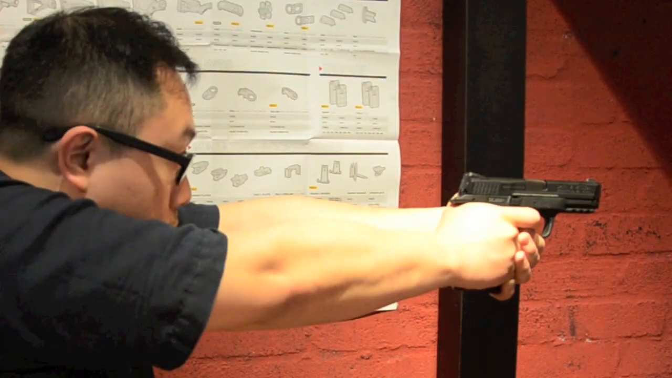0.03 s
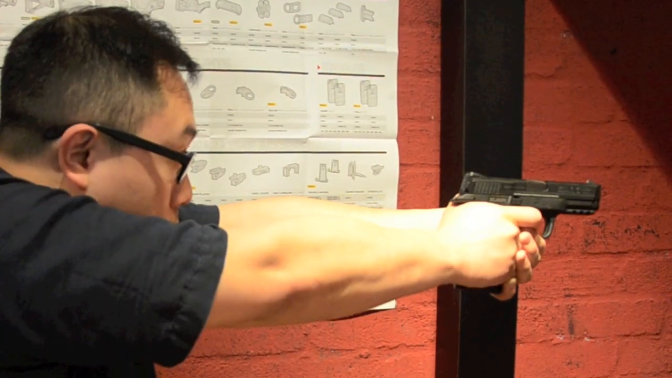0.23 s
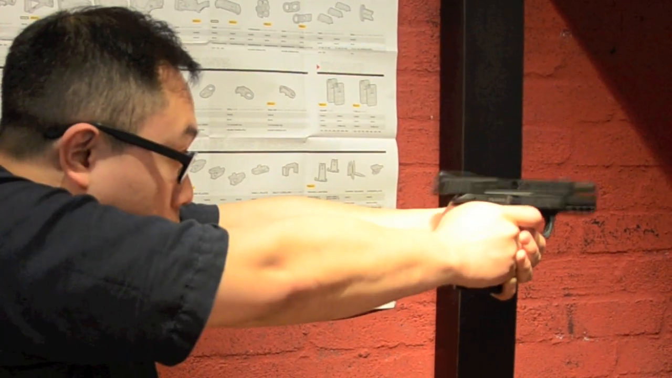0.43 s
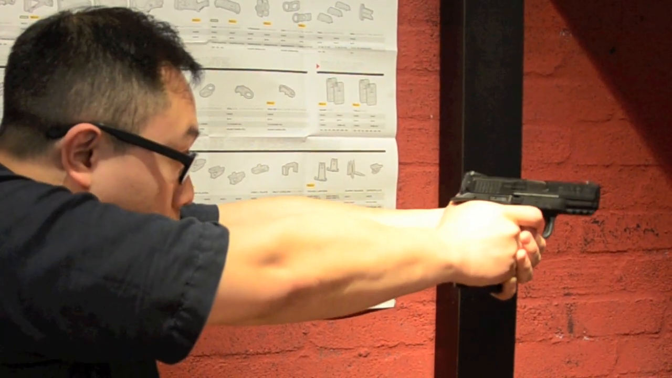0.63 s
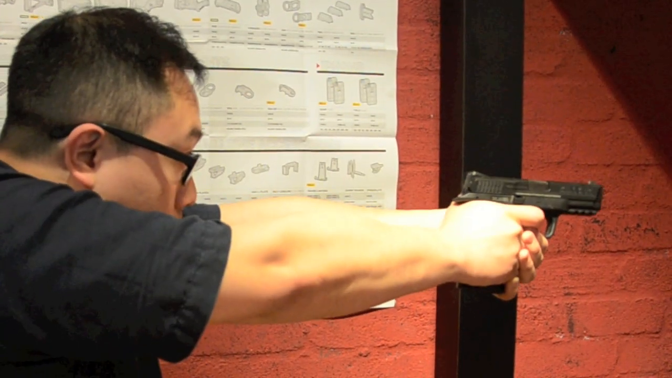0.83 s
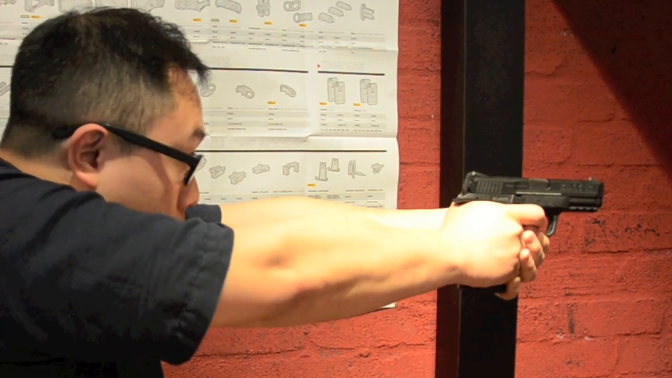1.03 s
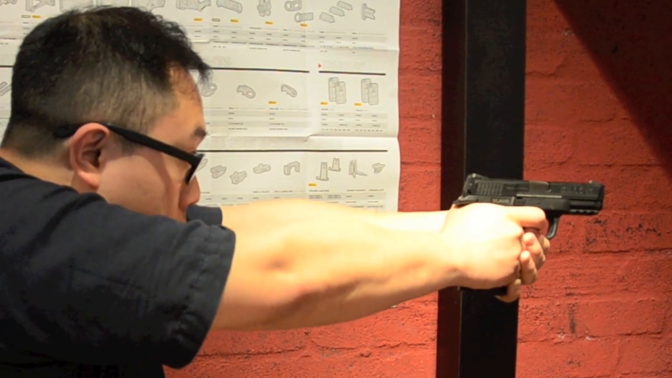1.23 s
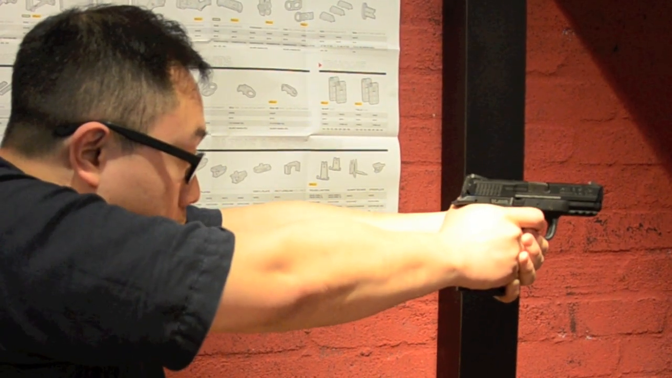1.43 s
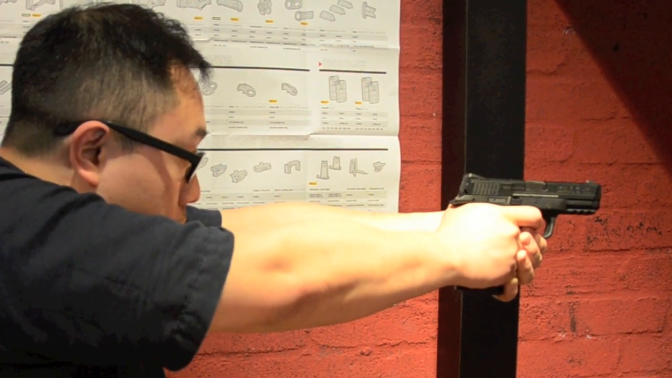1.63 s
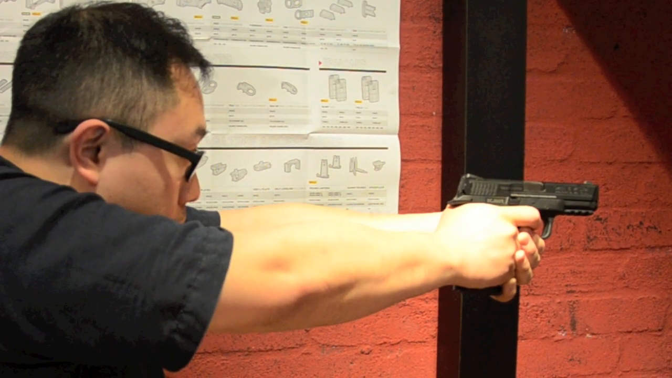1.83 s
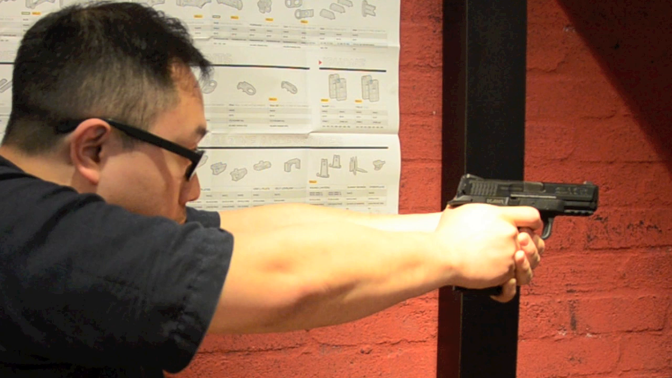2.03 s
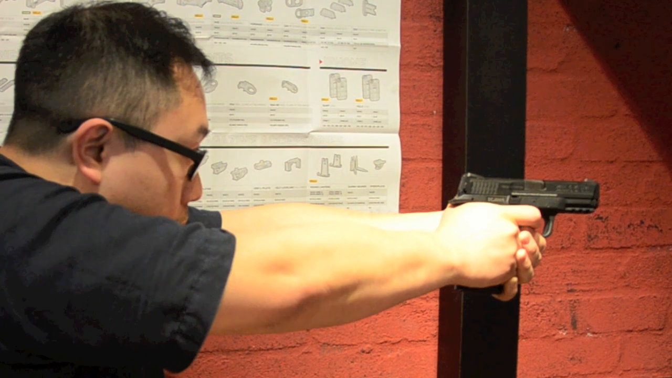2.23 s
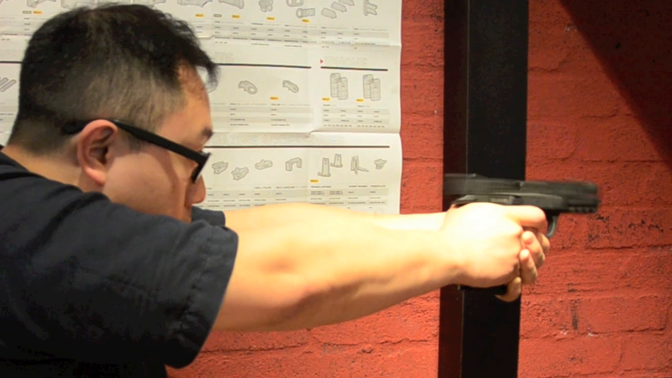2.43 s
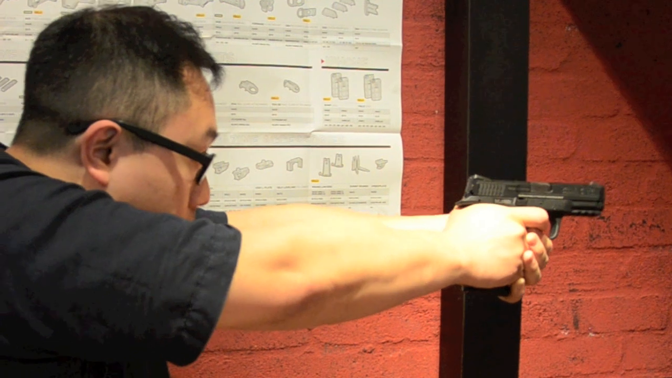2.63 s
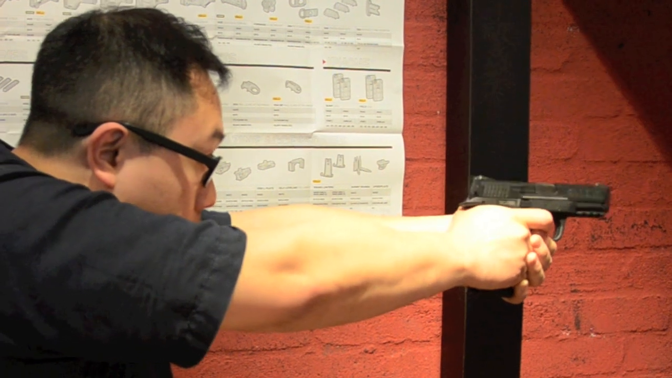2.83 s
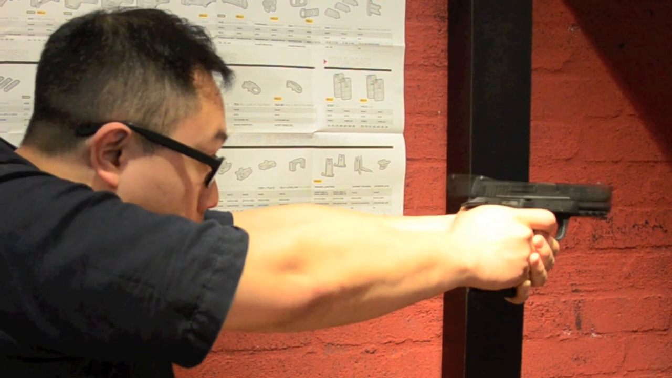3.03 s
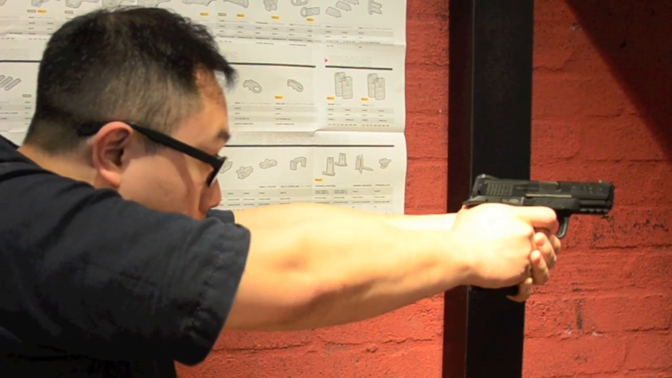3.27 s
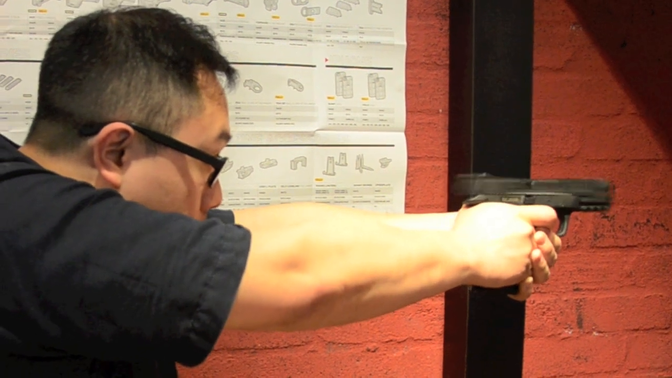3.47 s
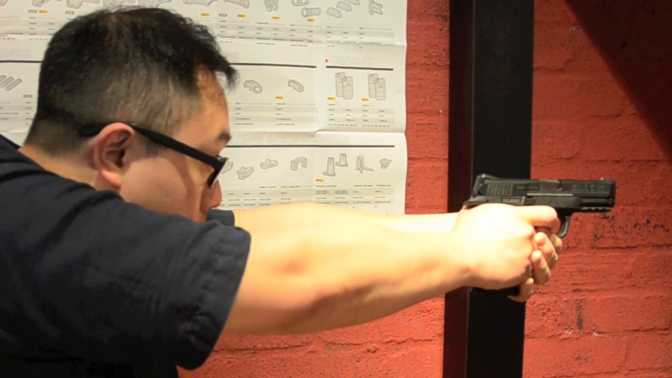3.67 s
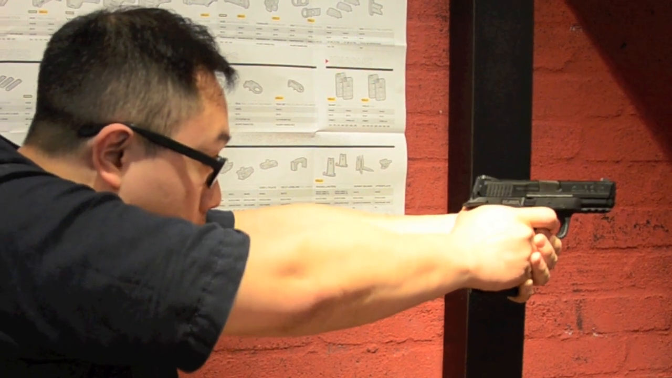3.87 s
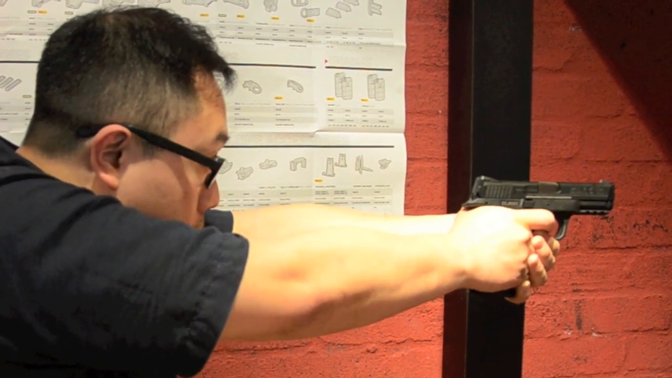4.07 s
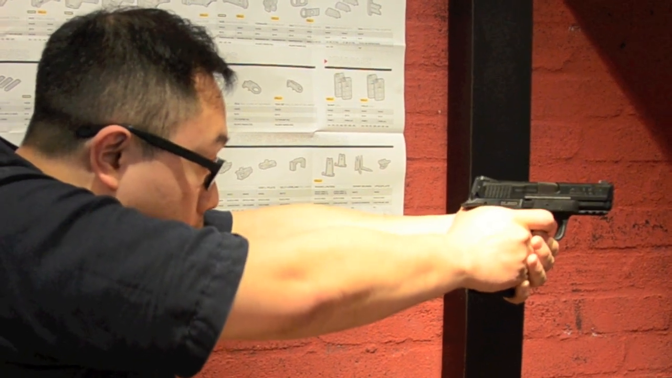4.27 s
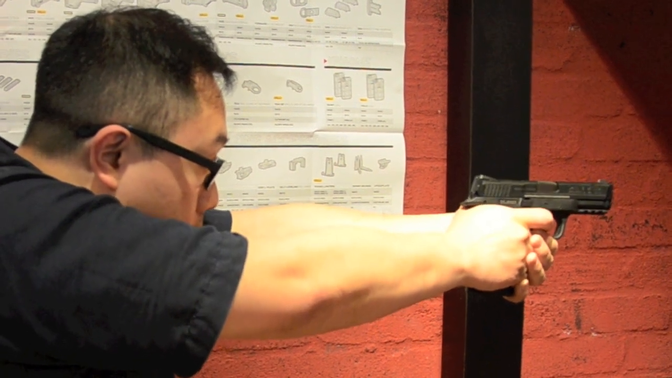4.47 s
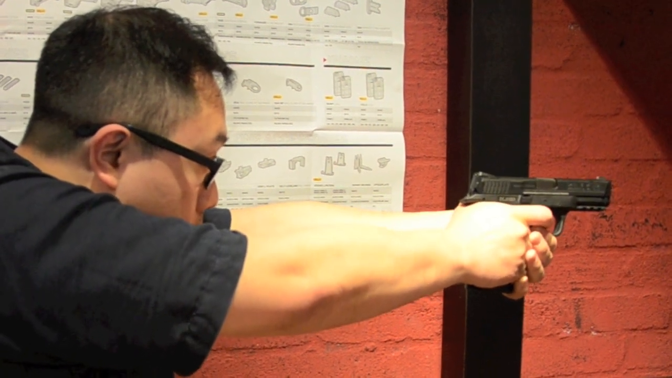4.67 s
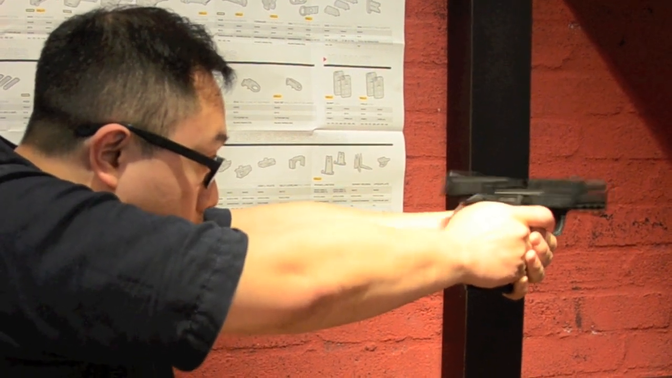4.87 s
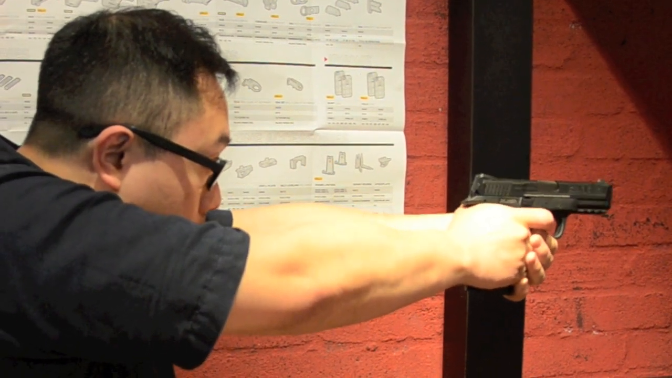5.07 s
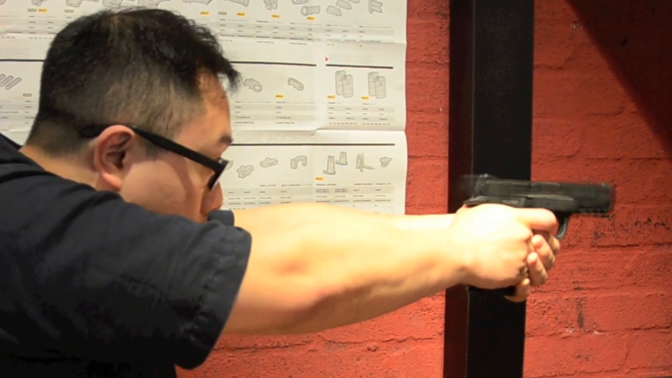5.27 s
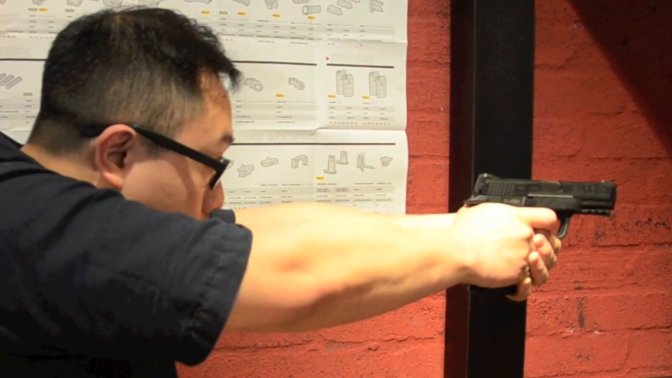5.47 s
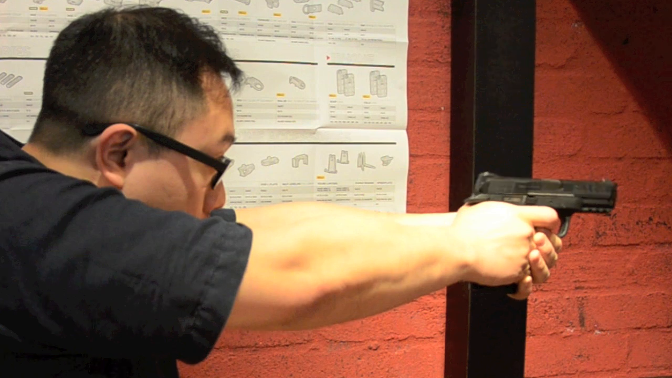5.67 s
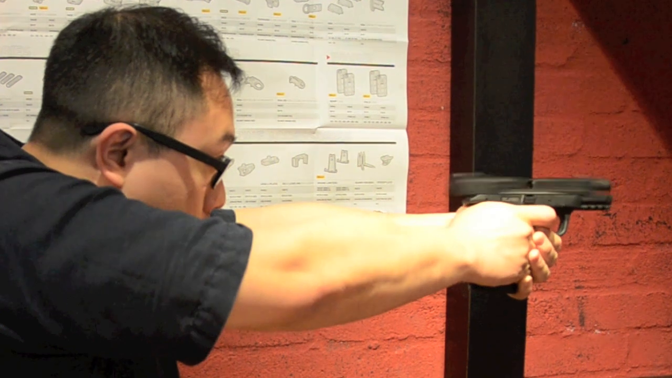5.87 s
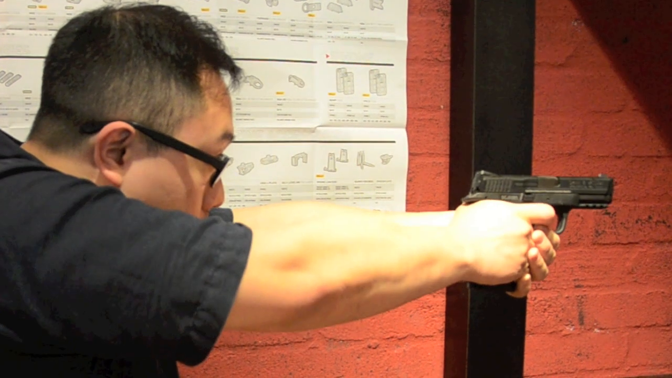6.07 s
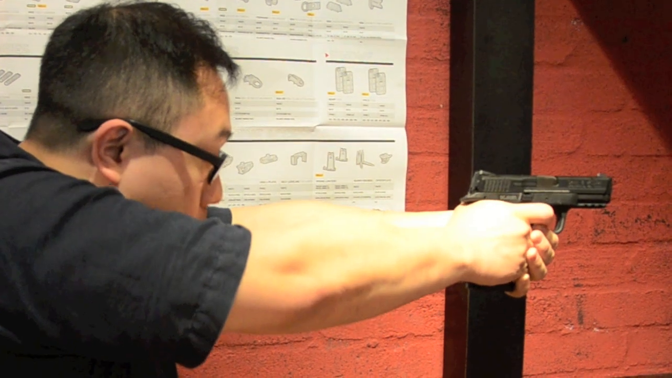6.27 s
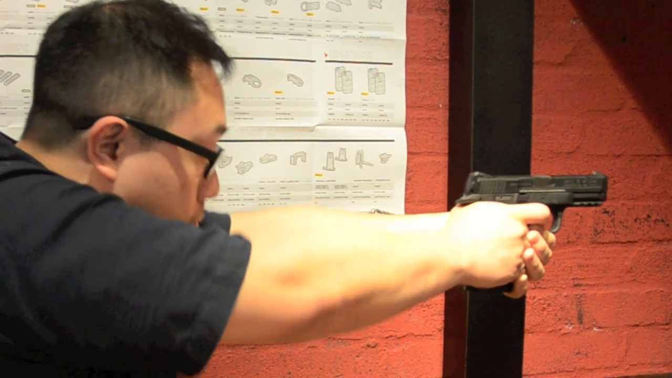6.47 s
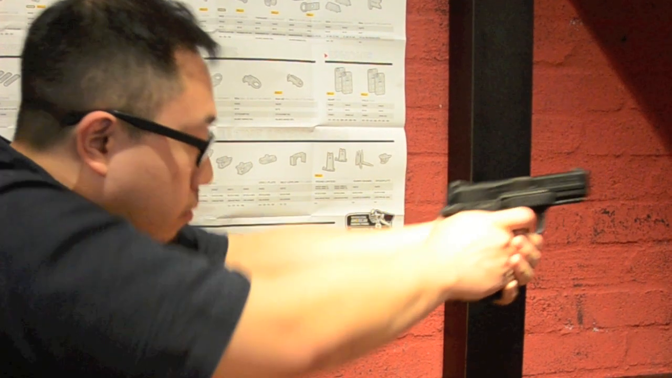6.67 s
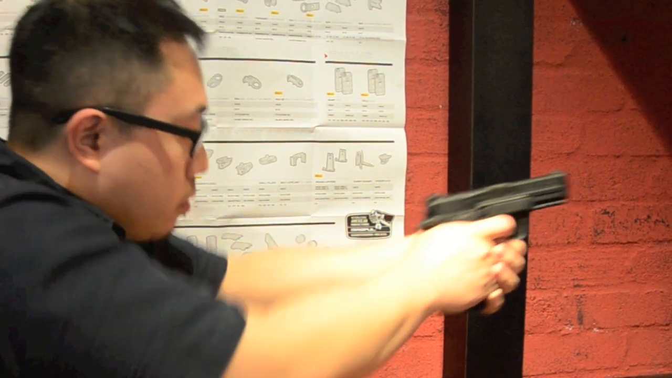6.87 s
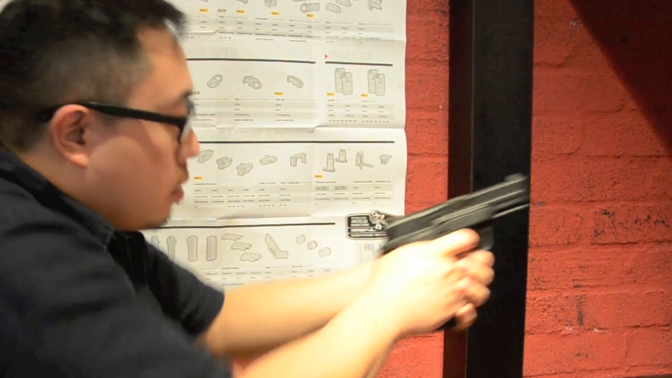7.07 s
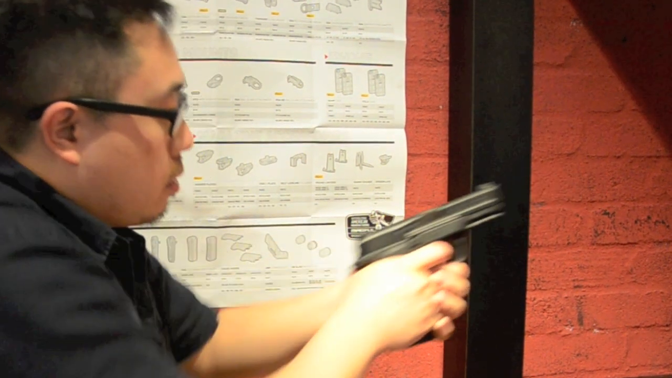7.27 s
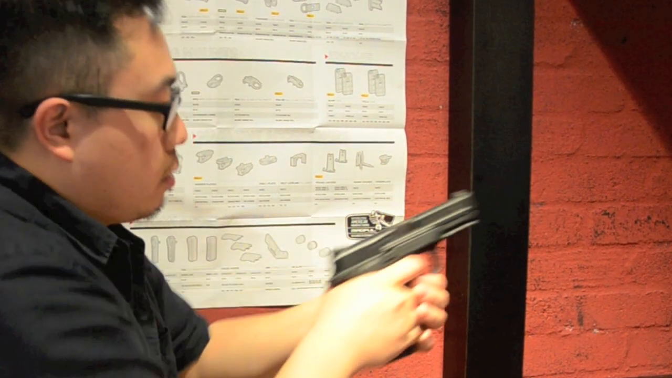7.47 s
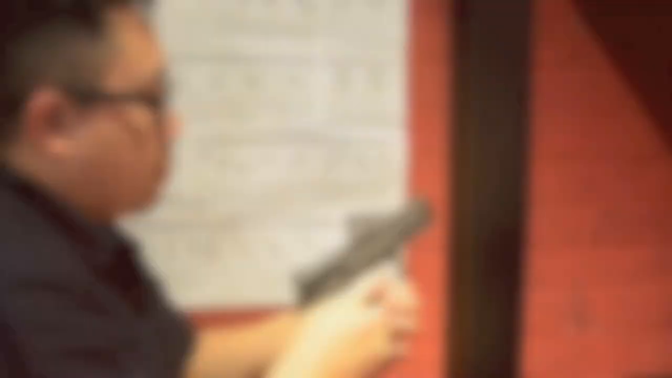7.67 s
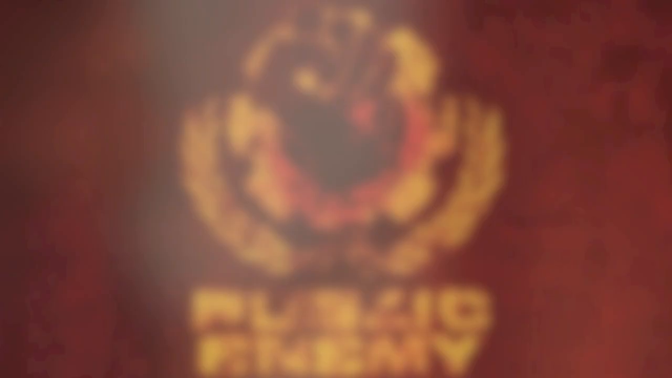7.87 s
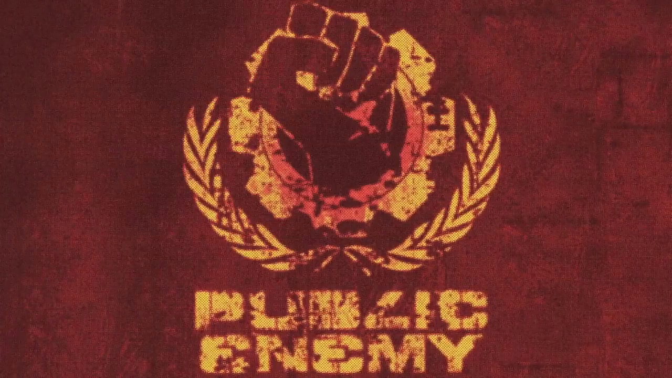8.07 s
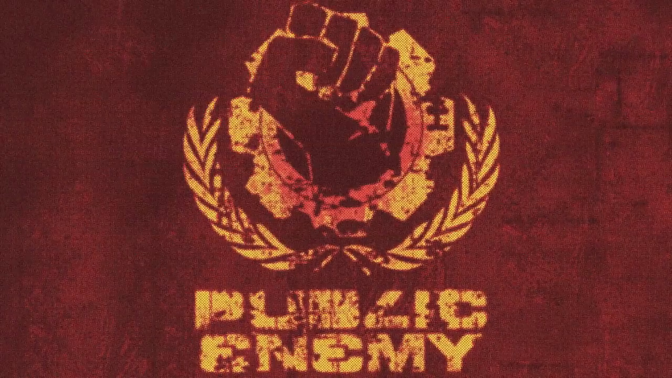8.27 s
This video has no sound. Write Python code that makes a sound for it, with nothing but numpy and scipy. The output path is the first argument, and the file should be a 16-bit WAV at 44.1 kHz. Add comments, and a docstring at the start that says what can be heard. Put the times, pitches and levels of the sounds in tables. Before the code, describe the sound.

A gas airsoft pistol fires close to the microphone in three quick runs: three shots, then four, then four more. Each is a sharp crack with a metal slide clatter, followed at once by the pellet smacking a target and a short echo in the hard-walled indoor range. Between and after the runs, other shooters pop and clack further away over a soft ventilation rush, until the sound fades out.

```python
"""Airsoft pistol at an indoor range

A gas pistol fires three quick runs of shots: each is a blast of gas and a clatter of the metal slide.
An eighth of a second later the pellet smacks a target, and the hard-walled hall echoes.
Other shooters pop and clack further away, over the rush of the ventilation. The microphone's volume
control ducks on every shot, the first instant overloads, and the sound fades out at the end."""
import sys
import numpy as np
from scipy import signal
from scipy.fft import rfft, irfft
from scipy.io import wavfile

SR = 44100
rng = np.random.default_rng(int(sys.argv[2]) if len(sys.argv) > 2 else 0)


def wav_record(signal):
    """Record a signal, one row per channel, as 16-bit PCM in the file named by sys.argv[1]."""
    frames = np.transpose(np.atleast_2d(signal))
    bounded = np.clip(frames, -1, 1)
    # unit amplitude maps onto the largest positive 16-bit level
    quanta = np.round(bounded * 32767).astype(np.int16)
    wavfile.write(sys.argv[1], SR, quanta)


N = 366372
LEAD = SR // 2   # extra samples before time zero, so an earlier shot can still be echoing

# The shots, weakening through each run as the gas cools. Boom and smack are relative to the level.
# start_s, level_db, booth_boom_db, pellet_smack_db
PISTOL_SHOTS = [(-.27, 16.5, -2, -14), (0.0713, 17, -15.5, -7.5), (0.4131, 15, -9, -12.5),
                (0.707, 9.5, 2, -13.5), (2.3377, 13, -1, -7), (2.7129, 14, 7, -7.5),
                (3.0323, 12, -1, -13.5), (3.3349, 8.5, -1, -15.5), (4.8265, 13.5, -4.5, -7.5),
                (5.1536, 13, 18, -21.5), (5.5094, 9, 17, -14.5), (5.778, 3, 17.5, -12.5)]
# Tone of the gas blast: frequency_hz, level_db
BLAST_SPECTRUM = [(30, -34), (65, -10), (100, -8), (170, -2.5), (230, -6.5), (350, -2.5), (480, -2.5),
                  (700, -0.5), (1200, -1.5), (1750, -1), (2500, -2), (3300, -1.5), (5000, -10),
                  (9000, -16.5)]
# Ringing notes of the slide and frame: pitch_hz, ring_s (time to fall 60 dB), level_db
SLIDE_NOTES = [(666, 0.0051, -14), (1012, 0.046, 1.5), (1408, 0.013, 11.5), (2220, 0.06, -9),
               (2585, 0.016, 10), (3267, 0.046, 2)]
# Tone of a pellet hitting the target: frequency_hz, level_db
SMACK_SPECTRUM = [(60, -16.5), (280, -4.5), (700, 2), (1700, 11.5), (3000, -4.5), (5000, 2), (9000, -9.5)]
# Sharp metal clacks from other lanes: start_s, level_db, brightness_db_per_octave, ring_hz
LANE_CLACKS = [(1.807, -17, 0.6, 5200), (2.23, -19.5, 1, 5240), (3.896, -19.5, -1, 5500),
               (4.112, -10.5, 1.5, 5400), (4.184, -16.5, 1.5, 5400), (6.301, -18.5, -1.5, 4880),
               (7.368, -30, -0.7, 4293), (7.943, -25, 0.3, 1900)]
# Dull, smeared pops from the far end of the hall: start_s, level_db, brightness_db_per_octave, ring_hz
LANE_POPS = [(1.234, -21.5, -4.5, 1598), (1.686, -32, 0.5, 1800), (2.044, -28, 0.5, 1746),
             (2.091, -33, -0.5, 1710), (4.033, -19, -0.5, 1100), (4.454, -27.5, 1.5, 1805),
             (6.768, -32, -.5, 1975), (6.877, -34, -1, 916), (7.067, -37.5, 1.5, 1730),
             (7.313, -43.5, -2, 900), (7.599, -46, 0.5, 4400)]
# Tone shared by those clacks and pops: frequency_hz, level_db
DISTANT_SPECTRUM = [(60, -20), (300, -16.5), (480, -9), (650, -6.5), (930, -6), (1200, -5.5), (1750, 1.5),
                    (2400, -1.5), (4500, -4.5), (5500, -10), (6500, -9.5), (9000, -23)]
# The pistol ticks in the hands as it is lowered: start_s, level_db
HANDLING_TICKS = [(7.7029, -17)]
# Tone of the rushing air: frequency_hz, level_db
AIR_SPECTRUM = [(25, -13), (65, 2.5), (130, 3.5), (330, -1.5), (500, -4.5), (1000, -4.5), (1800, -6),
                (4000, -13.5), (9000, -27.5)]
# Fan hum and a thin electronic whine: pitch_hz, level_db
STEADY_TONES = [(129, -68.5), (242, -64), (360.7, -56.5), (7865, -49)]
# Bounces off the walls of the shooting booth: delay_s, level_db
BOOTH_ECHOES = [(.0042, -3), (.0085, -12.5), (0.0156, -2), (0.026, -7.5)]
# How long the hall echoes: frequency_hz, ring_s (time to fall 60 dB)
HALL_RING_TIMES = [(60, 1.1), (250, 1.233), (700, 1.07), (1700, 1.205), (4000, 1.06), (6500, 0.85),
                   (10000, 0.27)]
# How well the microphone hears each pitch: frequency_hz, gain_db
MIC_RESPONSE = [(1000, -1), (5200, -3), (6000, -9.5), (7000, -14.5), (8500, -18.5), (9500, -18.5),
                (11000, -36)]
# Narrow bands that the microphone's housing takes out: frequency_hz, width_hz
MIC_DIPS = [(2850, 214), (3450, 150), (7500, 300), (10000, 1000)]


def pistol(hammer_s=0.0048, valve_s=0.0014, slide_back_s=0.004, slide_shut_s=0.02):
    """The hammer falls, the valve lets out a blast of gas, the slide flies back and slams shut."""
    gas, metal, blasts, booms = np.zeros((4, LEAD + N))
    boom = booth_boom()
    pulse = unit_energy(click(BLAST_SPECTRUM, tilt_db=1.0))
    for s, db, boom_db, _ in PISTOL_SHOTS:
        blast = from_db(db) * pulse
        add(metal, s - hammer_s, from_db(db - 38) * slide_ring())
        add(gas, s - valve_s, from_db(-24) * puff(blast, decay_s=0.0016))   # the valve cracks open
        add(gas, s, puff(blast, decay_s=0.0047))
        add(metal, s + slide_back_s, from_db(db - 1) * slide_ring())
        add(metal, s + slide_shut_s, from_db(db - 9) * slide_ring())
        add(blasts, s, blast)
        add(booms, s, from_db(db + boom_db) * boom)
    barrel = resonate(blasts, hz=1770, q=5.7, db=-6)   # air in the barrel colours the blast
    into_hall = from_db(-0.5) * barrel + from_db(-14) * metal
    room = from_db(24) * early_echoes(into_hall, decay_s=0.07) + hall(into_hall, build_s=0.01)
    return from_db(24.5) * booth(gas + metal) + booms + room


def slide_ring(size=4096):
    """A knock makes the metal slide ring briefly, with a slightly different mix of notes each time."""
    t = np.arange(size) / SR
    ring = 0
    for hz, ring_s, db in SLIDE_NOTES:
        envelope = from_db(db + rng.normal(0, 2) - 60 * t / ring_s)
        ring = ring + envelope * np.sin(2 * np.pi * hz * t) * rng.choice([-1, 1])
    return unit_energy(ring)


def booth_boom(pitch_hz=276, ring_s=0.67, q=11.0):
    """Sound trapped between the booth's walls booms, wavering as it dies away."""
    t = np.arange(2 * SR) / SR
    waves = rng.standard_normal(len(t))
    for _ in range(2):
        waves = signal.lfilter(*signal.iirpeak(pitch_hz, q, fs=SR), waves)
    return unit_energy(waves * 1000 ** (-t / ring_s))


def target(flight_s=0.1258, lag_s_per_db=0.00028, lag_s_per_shot=0.00025):
    """Each pellet hits the target with a crack and a short ping, and its smack fills the hall."""
    smacks, cracks = np.zeros((2, LEAD + N))
    smack = unit_energy(click(SMACK_SPECTRUM, tilt_db=-1.13))
    crack = unit_energy(click(SMACK_SPECTRUM, tilt_db=-1.5))
    loudest_db = max(db for _, db, _, _ in PISTOL_SHOTS)
    for fired, (s, db, _, smack_db) in enumerate(PISTOL_SHOTS):
        # Pellets fly slower after a weak shot, and as the magazine chills.
        arrival_s = s + flight_s + lag_s_per_db * (loudest_db - db) + lag_s_per_shot * fired
        add(smacks, arrival_s, from_db(db + smack_db) * smack)
        crack_db = 14.5 + 0.55 * db + 0.93 * fired   # partly follows the shot, grows from run to run
        add(cracks, arrival_s, from_db(crack_db) * puff(crack, decay_s=0.0041))
    pings = resonate(cracks, hz=3200, q=9.1, db=6)
    return booth(pings) + hall(smacks, build_s=0.0025)


def other_lanes():
    """The other shooters are heard only through echoes: a first cluster, then the whole hall."""
    clacks = distant_shots(LANE_CLACKS, decay_s=0.004, ring_db=4.5, knock_db=-0.5)
    pops = distant_shots(LANE_POPS, decay_s=0.02, ring_db=-0.5, knock_db=-10)
    shots = clacks + pops
    early = from_db(31) * early_echoes(shots, decay_s=0.076)
    return early + from_db(-3.5) * hall(shots, build_s=0.0033)


def distant_shots(rows, decay_s, ring_db, knock_db, knock_hz=900, q=5.0):
    """Short puffs, each with the same low knock and a ring of its own."""
    track = np.zeros(LEAD + N)
    for s, db, tilt_db, ring_hz in rows:
        pop = puff(click(DISTANT_SPECTRUM, tilt_db), decay_s)
        pop = resonate(pop, knock_hz, q, knock_db)
        pop = resonate(pop, ring_hz, q, ring_db)
        add(track, s, from_db(db) * unit_energy(pop))
    return track


def handling():
    """The pistol gives a light, dull tick in the hands, close to the microphone."""
    track = np.zeros(LEAD + N)
    for s, db in HANDLING_TICKS:
        tick = puff(click(SMACK_SPECTRUM, tilt_db=-2), decay_s=0.0023)
        add(track, s, from_db(db) * unit_energy(tick))
    return booth(track) + from_db(-30) * hall(track, build_s=0.0054)


def ventilation(air_db=-47):
    """Moving air rushes steadily, with fan hum and a thin electronic whine on top."""
    t = np.arange(LEAD + N) / SR
    noise = rng.standard_normal(len(t))
    air = signal.oaconvolve(noise, unit_energy(click(AIR_SPECTRUM)))[:len(t)]
    tones = sum(from_db(db) * np.sqrt(2) * np.sin(2 * np.pi * hz * t) for hz, db in STEADY_TONES)
    return from_db(air_db) * air + tones


def booth(x):
    """The sound itself plus its first bounces off the nearby walls."""
    out = x.copy()
    for delay_s, db in BOOTH_ECHOES:
        lag = round(delay_s * SR)
        out[lag:] += from_db(db) * x[:-lag]
    return out


def early_echoes(x, decay_s):
    """A dense cluster of first echoes from the floor, ceiling and partitions."""
    t = np.arange(SR // 3) / SR
    echoes = rng.standard_normal(len(t)) * np.exp(-t / decay_s)
    return signal.oaconvolve(x, unit_energy(echoes))[:len(x)]


def hall(x, build_s):
    """Countless echoes blur into a tail that builds up, then dies away, high pitches first."""
    t = np.arange(2 * SR) / SR
    hz = np.arange(SR + 1) / 2
    noise_spectrum = rfft(rng.standard_normal(len(t)))
    centres_hz = np.geomspace(60, 12000, 12)
    tail = 0
    for centre_hz, share in zip(centres_hz, np.eye(len(centres_hz))):
        band = irfft(noise_spectrum * np.interp(hz, centres_hz, share))
        tail = tail + band * 1000 ** (-t / at_hz(HALL_RING_TIMES, centre_hz))
    build_up = 1 - np.exp(-t / build_s)
    return signal.oaconvolve(x, tail * build_up)[:len(x)]


def click(spectrum, tilt_db=0, size=4096):
    """A sharp click with the given tone; tilt_db brightens it by that much per octave."""
    hz = np.arange(size // 2 + 1) * SR / size
    db = at_hz(spectrum, hz) + tilt_db * np.log2(np.maximum(hz, 300) / 2000)
    # Pack the energy at the very start without changing the tone (minimum phase).
    cepstrum = irfft(np.log(from_db(db)))
    cepstrum[1:size // 2] *= 2
    cepstrum[size // 2 + 1:] = 0
    return irfft(np.exp(rfft(cepstrum)))


def puff(pulse, decay_s, size=4096):
    """Smear a click into a short, noisy puff that dies away."""
    envelope = np.exp(-np.arange(size) / (decay_s * SR))
    noise = rng.standard_normal(size) * envelope
    for _ in range(3):   # even out the noise so no pitch sticks out
        flat_spectrum = np.exp(1j * np.angle(rfft(noise)))
        noise = irfft(flat_spectrum) * envelope ** 0.25
    return signal.fftconvolve(unit_energy(noise), pulse)


def resonate(x, hz, q, db):
    """Add a ring at one pitch; a higher q makes it narrower and longer."""
    return x + from_db(db) * signal.lfilter(*signal.iirpeak(hz, q, fs=SR), x)


def from_db(db):
    """Turn decibels into a multiplier."""
    return 10 ** (np.asarray(db) / 20)


def unit_energy(x):
    """Scale a sound so its squared samples add up to one."""
    return x / np.sqrt(np.sum(x ** 2) + 1e-20)


def at_hz(table, hz):
    """Read between a table's rows, with frequency spaced in octaves."""
    freqs, values = np.transpose(table)
    return np.interp(np.log(np.maximum(hz, 1)), np.log(freqs), values)


def add(track, start_s, sound):
    """Mix a sound into a track that begins LEAD samples before time zero."""
    start = max(LEAD + round(start_s * SR), 0)
    part = sound[:len(track) - start]
    track[start:start + len(part)] += part


def scene():
    """Everything that reaches the microphone beside the shooter."""
    return (pistol() + target() + other_lanes() + handling() + ventilation())[None, LEAD:]


def volume_control(x, threshold_db=-7.5, recovery_db_per_s=27, attack_s=0.0028, sense_s=0.0029):
    """Loud sound turns the volume down at once; it creeps back up, making the echoes linger."""
    sense, attack = np.exp(-1 / (sense_s * SR)), np.exp(-1 / (attack_s * SR))
    power = signal.lfilter([1 - sense], [1, -sense], x ** 2)
    excess_db = np.maximum(10 * np.log10(power + 1e-12) - threshold_db, 0)
    excess_db[0] = 16   # still held down by the shot before time zero
    recovery_db = recovery_db_per_s * np.arange(N) / SR
    held_db = np.maximum.accumulate(excess_db + recovery_db) - recovery_db
    cut_db, _ = signal.lfilter([1 - attack], [1, -attack], held_db, zi=[attack * held_db[0]])
    return x * from_db(-cut_db)


def record(dry, ceiling=0.79, low_cut_hz=50, soft_top_hz=9000, steep_top_hz=11200, fade_s=(7.57, 8.08)):
    """The microphone colours, ducks and clips the sound; lows and highs are cut and the end fades."""
    x = signal.oaconvolve(dry[0], click(MIC_RESPONSE))[:N]
    for hz, width_hz in MIC_DIPS:
        x = signal.lfilter(*signal.iirnotch(hz, hz / width_hz, fs=SR), x)
    x = np.clip(volume_control(x), -ceiling, ceiling)   # peaks overload before the volume drops
    x = signal.sosfilt(signal.butter(2, low_cut_hz, "high", fs=SR, output="sos"), x)
    x = signal.sosfilt(signal.bessel(2, soft_top_hz, norm="mag", fs=SR, output="sos"), x)
    x = x * np.interp(np.arange(N) / SR, fade_s, [1, 0])
    steep_cut = signal.firwin(81, steep_top_hz, window=("kaiser", 8), fs=SR)
    return signal.oaconvolve(x, steep_cut, "same")[None]


dry = scene()
out = record(dry)
wav_record(out)
```